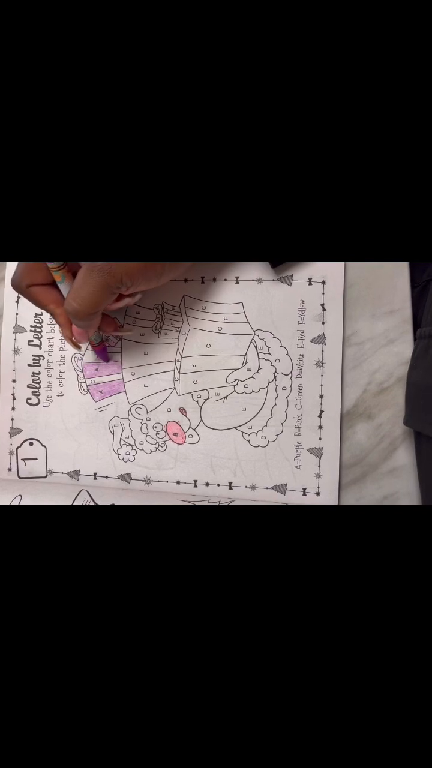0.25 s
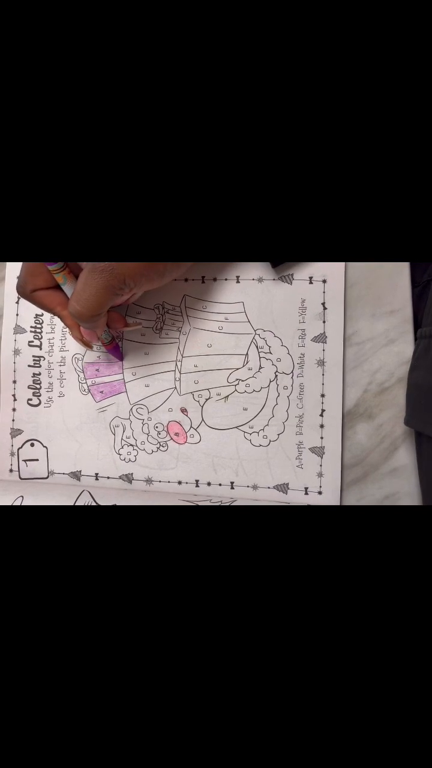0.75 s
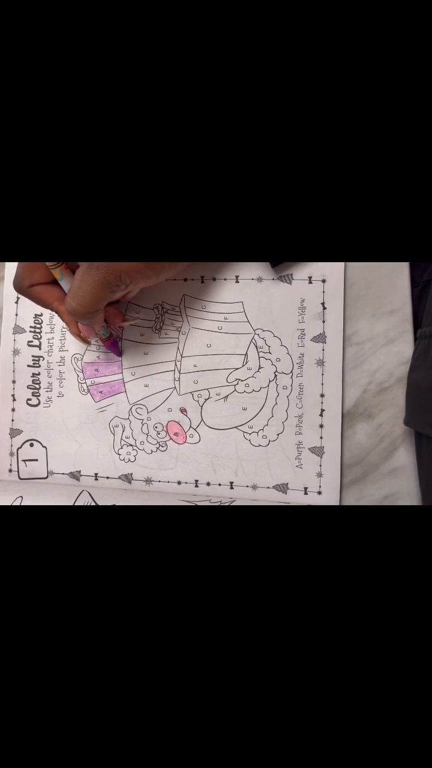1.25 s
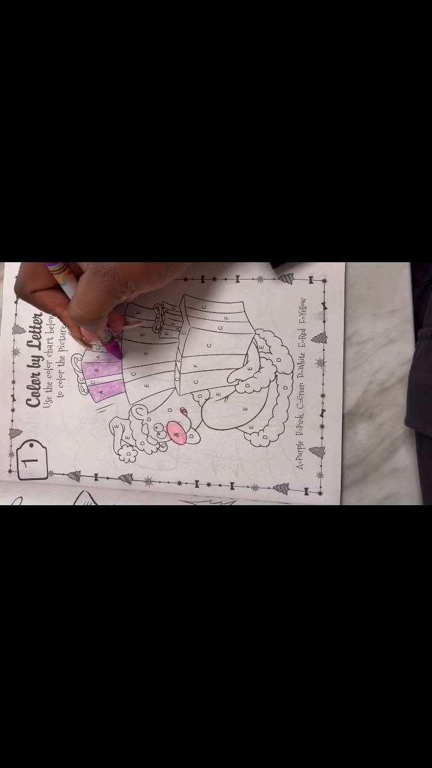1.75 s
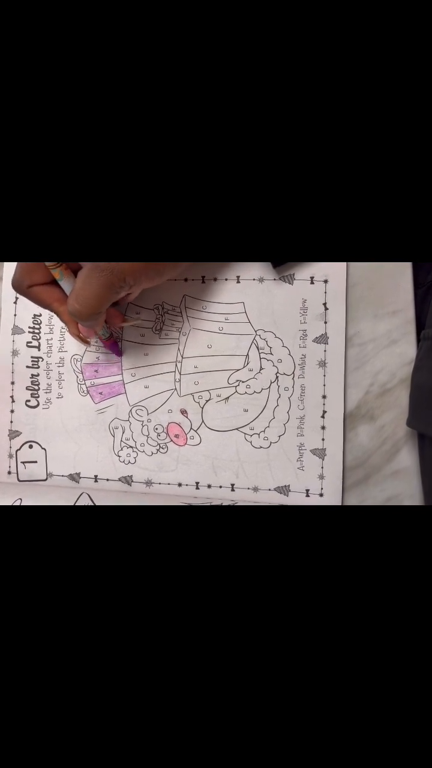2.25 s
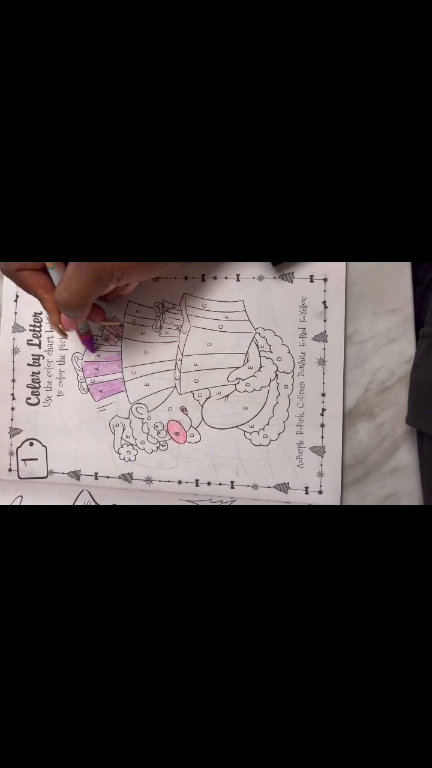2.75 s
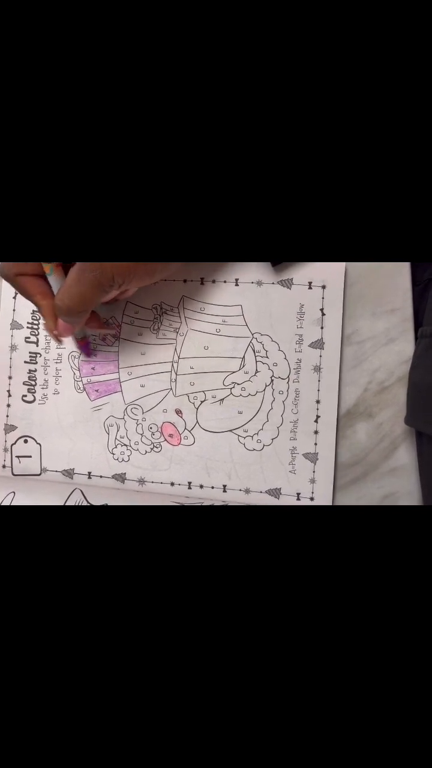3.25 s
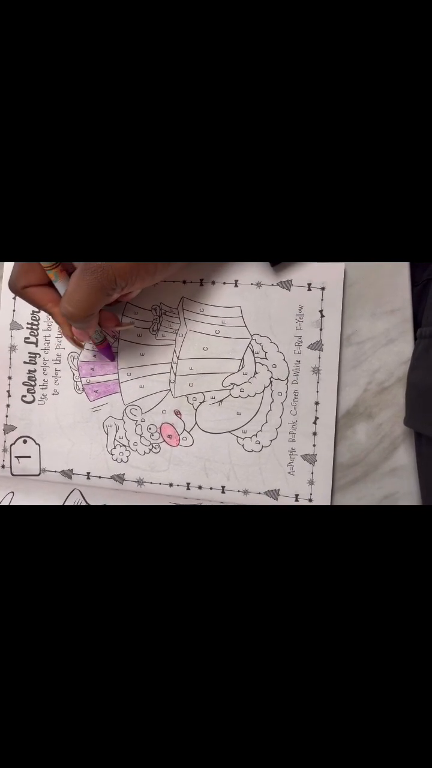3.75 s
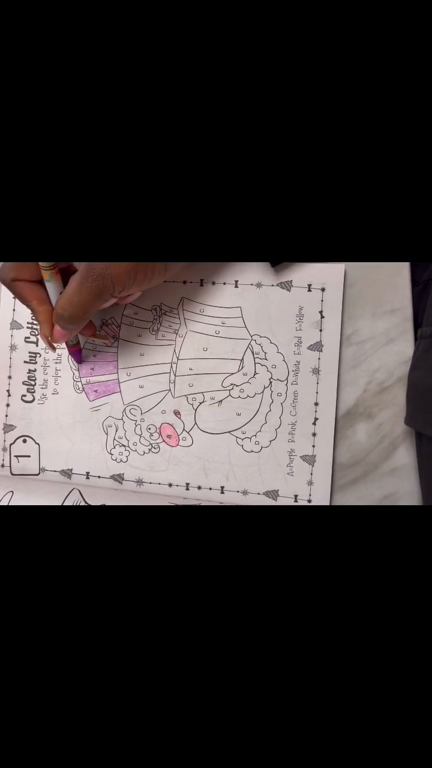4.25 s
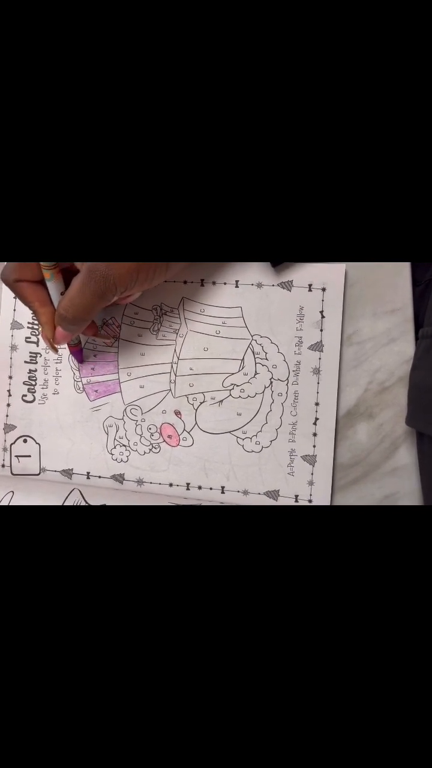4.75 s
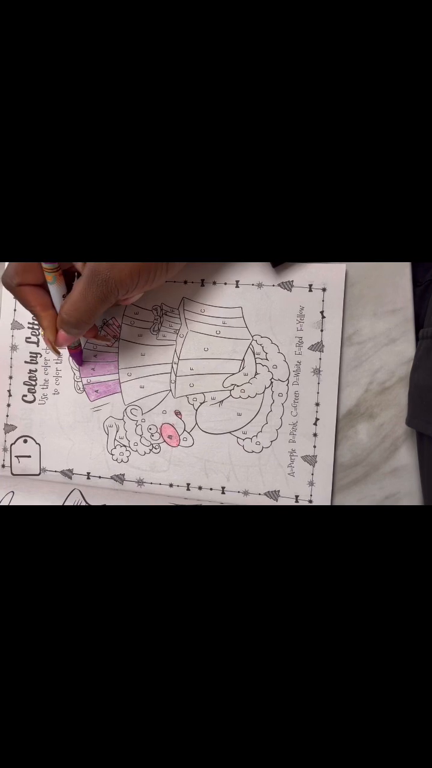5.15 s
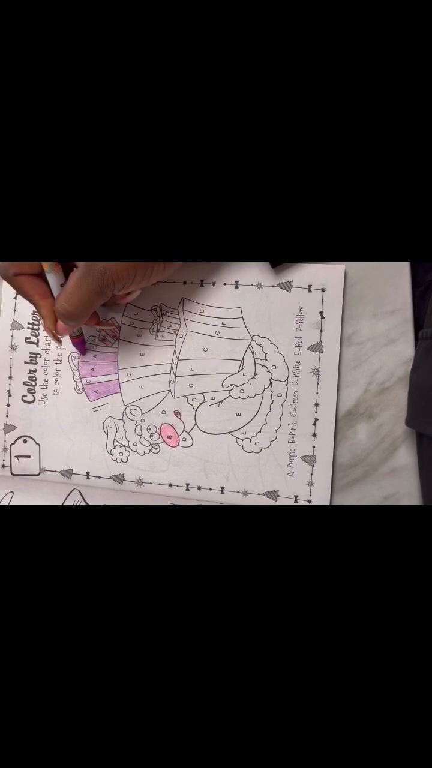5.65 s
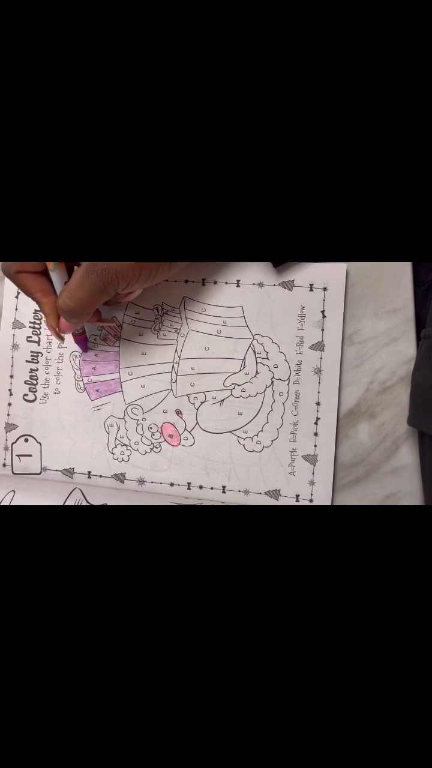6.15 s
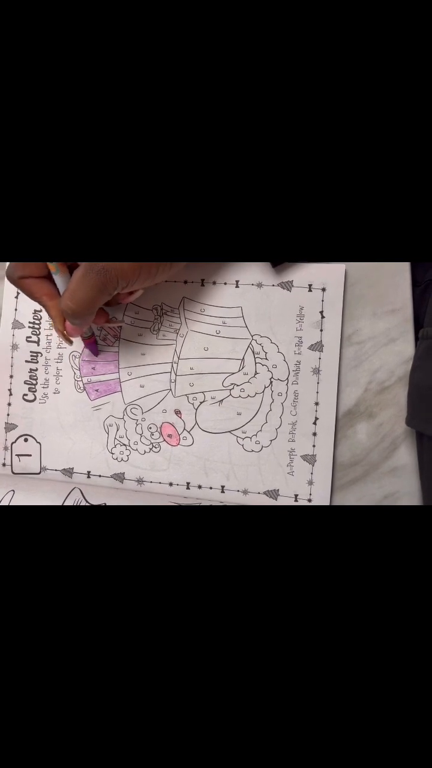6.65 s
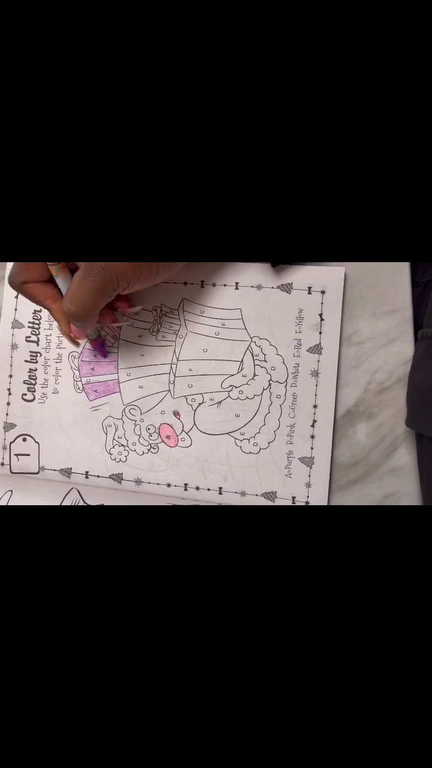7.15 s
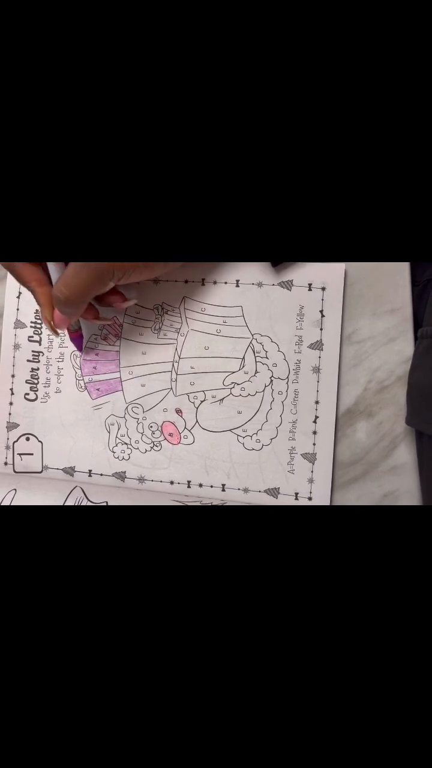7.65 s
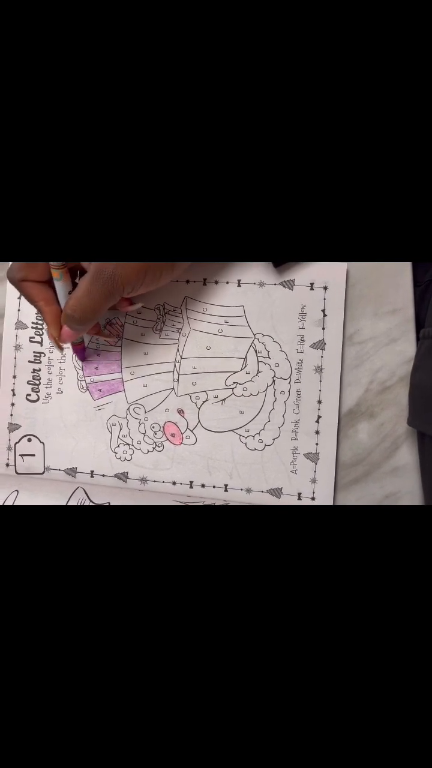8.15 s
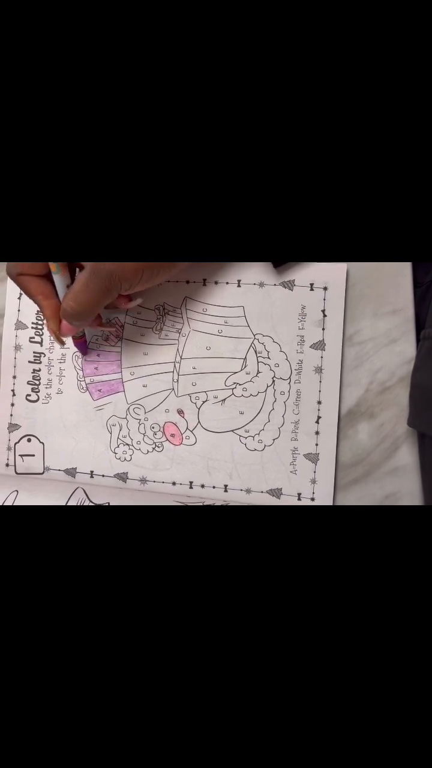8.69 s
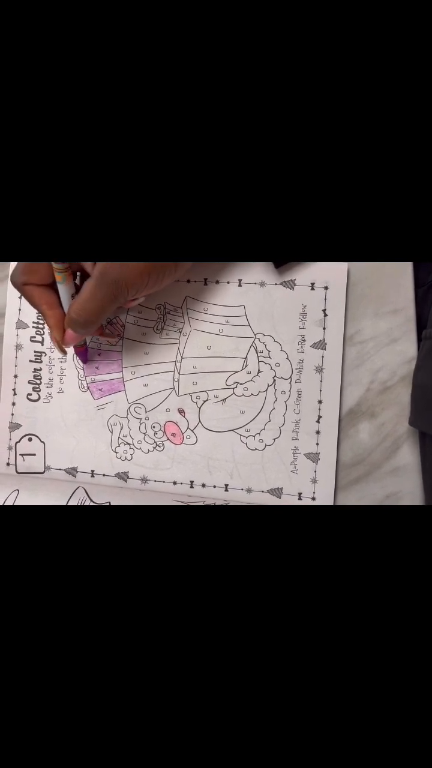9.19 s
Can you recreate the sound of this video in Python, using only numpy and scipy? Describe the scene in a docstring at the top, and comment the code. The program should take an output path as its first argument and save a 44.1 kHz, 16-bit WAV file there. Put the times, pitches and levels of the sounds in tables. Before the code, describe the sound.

Close, dry crayon scratching on a colouring page comes in uneven short bursts, the sheet rustling and ticking above a throbbing low motor hum indoors.

```python
"""A wax crayon is rubbed back and forth on a colouring page lying on a table, close to a two-port microphone.
Wax catching on paper fibres is grainy noise (hiss); it shakes the page (rustle) and the table (rumble).
The page ticks with short noise bursts, and dull knocks ring a few modes of the table.
Behind it, steady sines of motors and mains hum and beat, and shaped noise is the air's rumble and faint hiss.
Soft noise swells are scuffs further off, and short gliding sines are a bird's pips outside."""
import sys
import numpy as np
from scipy import signal
from scipy.fft import rfft, irfft, next_fast_len
from scipy.io import wavfile
from scipy.ndimage import uniform_filter1d

SR = 44100
rng = np.random.default_rng(int(sys.argv[2]) if len(sys.argv) > 2 else 0)


def unload_wav(signal):
    """Save mono or channel-first audio to the path in sys.argv[1] as 16-bit WAV at rate SR, clipped to [-1, 1]."""
    wavfile.write(
        sys.argv[1],
        SR,
        np.round(np.clip(np.atleast_2d(signal).T, -1, 1) * 32767).astype(np.int16),
    )


def undo_db(level):
    """Turn decibels back into plain size, where 20 dB means ten times bigger."""
    steps = np.asarray(level, float) / 20
    return 10 ** steps


N = 415403
T = np.arange(N) / SR  # time in s
SIZE = next_fast_len(N)  # transform length for filtering
HZ = np.arange(SIZE // 2 + 1) * SR / SIZE + 1e-6  # just above zero, so that its log exists

# colour of the table's rumble, under strokes and ticks: [f/Hz, relative level/dB]
TABLE_RUMBLE = [(250, -11), (450, 7), (700, 3.5), (1000, -4.5), (1500, -10.5), (2200, -38.5)]


def table(points):
    """A list of (Hz, value) points read at every frequency, straight on a log frequency axis."""
    hz, value = np.transpose(points)
    return np.interp(np.log(HZ), np.log(hz), value)


def shape(x, gain):
    """Filter by a gain given at every frequency."""
    return irfft(rfft(x, SIZE) * gain, SIZE)[..., :N]


def unit_rms(x):
    """Scale a sound to an rms of one."""
    return x / np.sqrt(np.mean(x ** 2))


def colour(x, points):
    """Shape a sound by (Hz, dB) points and bring it to unit rms."""
    return unit_rms(shape(x, undo_db(table(points))))


def walk(rate):
    """Smooth random drift of unit spread: noise averaged twice over 1 / rate seconds."""
    k = int(SR / rate)
    smooth = uniform_filter1d(uniform_filter1d(rng.standard_normal(N), k), k)
    return smooth / smooth.std()


def grit(spread_db, patchy_db, patch_rate):
    """Dense catches of wax on fibres: some large ones among many small, in patches."""
    catch_db = spread_db * np.minimum(rng.exponential(size=N), 6.5)
    patch_db = patchy_db * walk(patch_rate)
    return undo_db(catch_db + patch_db) * rng.standard_normal(N)


def flex(x, wander_db, rate, low, count):
    """As the rubbed sheet bends, each third of an octave from low (Hz) up swells and fades on its own."""
    y = np.zeros(N)
    for centre in np.log2(low) + np.arange(count) / 3:
        distance = np.abs(np.log2(HZ) - centre)  # in octaves
        band = shape(x, np.clip(1 - 3 * distance, 0, 1))
        y += undo_db(wander_db * walk(rate)) * band
    return unit_rms(y)


def ports(x, pan_db, alike, spare):
    """A sound at the two ports, with a treble lag; a spare signal supplies the part that is not alike."""
    # how far the left port's phase is ahead of the right's: [f/Hz, phase/rad]
    left_lead = [(0, 0), (5200, -.2), (6700, -1.2), (7900, -2.8), (8900, -3.5), (10500, -5.8),
                 (11100, -6.1), (13200, -6.5), (14600, -8.5), (15300, -9.3)]
    alike = np.clip(alike, 0, 1)
    sign = np.array([[1], [-1]])  # left, right
    turn = np.exp(.5j * sign * np.interp(HZ, *np.transpose(left_lead)))
    shared = shape(x, np.sqrt((1 + alike) / 2) * turn)
    opposed = sign * shape(spare, np.sqrt((1 - alike) / 2))
    return (shared + opposed) * undo_db(sign * pan_db / 2)


def crayon():
    """Each stroke speeds up and slows down, driving hiss, page and table together."""
    # strokes: [middle t/s, length/s, hiss level at full speed/dB, page rustle over hiss/dB]
    strokes = [(0.023, .045, -84, 10.5), (.132, 0.069, -76.5, -5), (0.318, .11, -81.5, -2),
               (0.813, 0.1, -91, -6), (1.084, .052, -74, -12), (1.217, 0.05, -69.5, -9),
               (1.78, .057, -84.5, -1), (1.85, 0.075, -86, -3), (1.935, .063, -87, 8),
               (2.357, 0.11, -69.5, -5.5), (2.519, 0.059, -68, -6.5), (2.66, 0.067, -65.5, -9),
               (2.794, 0.078, -68, -4.5), (2.918, 0.074, -71, 0.5), (2.994, 0.042, -70.5, 7),
               (3.08, 0.057, -69.5, 6), (3.208, .06, -70, 1), (3.262, 0.041, -67, 4),
               (3.369, .095, -69.5, -2.5), (3.528, 0.043, -70.5, -11), (3.597, 0.024, -77.5, -5),
               (3.667, 0.077, -73, -1), (3.859, .12, -70.5, -5), (4.035, .055, -73.5, -6),
               (4.188, 0.051, -70.5, -8), (4.322, 0.031, -88.5, 4), (4.523, .07, -73, -11),
               (4.701, .066, -73.5, -7), (4.917, .06, -81.5, -4.5), (4.99, 0.039, -85, -5),
               (5.056, 0.063, -79.5, -10), (5.209, 0.072, -80, -15), (5.263, 0.028, -81.5, -6),
               (5.388, .065, -82, -9), (5.552, 0.069, -78.5, -3.5), (5.696, .11, -78.5, -12),
               (5.843, 0.075, -84.5, -2), (5.904, 0.028, -78.5, -17), (6.178, .055, -85, -13),
               (6.321, 0.057, -70.5, -3), (6.453, 0.059, -69.5, -5), (6.581, .068, -76.5, -1.5),
               (6.699, .046, -71, -6), (6.755, 0.022, -87, 7), (6.821, 0.057, -75.5, -5),
               (6.893, .06, -76.5, 2.5), (6.953, 0.068, -72, -1.5), (7.096, 0.075, -68.5, 2),
               (7.187, 0.09, -79.5, 0), (7.29, 0.044, -77.5, 0), (7.401, 0.069, -74, -8),
               (7.467, 0.06, -75.5, -2), (7.638, 0.049, -85.5, -7), (7.753, 0.025, -85.5, 1),
               (7.838, 0.023, -78, 9), (7.982, 0.092, -79.5, -10), (8.113, 0.076, -71, -5),
               (8.222, 0.025, -83.5, 1), (8.543, .06, -72.5, -13), (8.726, 0.092, -80, -7),
               (8.932, 0.08, -79.5, -10), (9.089, 0.057, -87.5, -2), (9.281, 0.064, -81.5, -2.5)]
    # slow state of the sheet:
    # [t/s, rustle level between strokes/dB, table rumble level at full speed for a -75 dB hiss/dB]
    sheet_state = [(0, -92, -80), (.3, -89.5, -80.5), (1.3, -89, -75), (1.8, -90, -66),
                   (2.35, -88.5, -67.5), (2.6, -86, -69), (2.9, -91, -71), (3.2, -73, -74),
                   (3.4, -78.5, -71), (4.0, -88.5, -79.5), (4.4, -91.5, -72), (5.0, -92.5, -72),
                   (5.7, -93, -71), (6.3, -88, -73.5), (6.9, -84, -76.5), (7.6, -78.5, -76.5),
                   (8.0, -88, -75.5), (8.6, -90.5, -67), (9.4, -88, -67)]
    # colour of wax on paper fibres: [f/Hz, relative level/dB]
    hiss_colour = [(3500, -30), (5000, -26), (5900, -12), (7500, -4), (8400, 3), (9300, -4.5),
                   (11000, -3.5), (11900, 0.5), (12800, -3), (13600, -11.5), (14500, -3.5), (15400, -2.5),
                   (16000, -26.5)]
    # colour of the shaken page: [f/Hz, relative level/dB]
    rustle_colour = [(710, -42.5), (1200, -7), (1460, -5.5), (2070, -3), (2240, -6), (2470, -1),
                     (2970, -2.5), (4160, -5), (5720, -14), (6500, -7.5), (8450, -46), (14300, -120)]
    edge_db, squareness = -5.5, 2.57  # level half a length from the middle; how flat a stroke's top is
    drag_db = -7.5  # hiss of the tip dragging between strokes, over the rustle there
    rumble_follows = 0.37  # dB of rumble per dB of hiss above -75
    resting_db = -13.5  # rumble between strokes, against the sheet's rumble level

    power = np.zeros((3, N))  # hiss, page, table
    s, rustle_db, rumble_db = np.transpose(sheet_state)
    for middle, length_s, hiss_db, page_db in strokes:
        on = slice(max(int((middle - .3) * SR), 0), int((middle + .3) * SR))
        speed_db = edge_db * (2 * np.abs(T[on] - middle) / length_s) ** squareness
        desk_db = np.interp(middle, s, rumble_db) + rumble_follows * (hiss_db + 75)
        full_db = np.array([[hiss_db], [hiss_db + page_db], [desk_db]])
        power[:, on] += undo_db(full_db + speed_db) ** 2
    rustle_between_db = np.interp(T, s, rustle_db)
    power[0] += undo_db(rustle_between_db + drag_db) ** 2
    power[1] += undo_db(rustle_between_db) ** 2
    power[2] += undo_db(np.interp(T, s, rumble_db) + resting_db) ** 2

    fine = grit(2.9, 2.0, 90)
    hiss = flex(colour(fine, hiss_colour), 1.4, 25, 3200, count=9)
    hiss_spare = colour(fine * rng.choice([-1, 1], N), hiss_colour)  # same catches, random signs
    hiss_alike = table([(6000, 0.99), (8400, .93), (11000, 1.0), (13000, 0.94), (14500, 0.39)])
    # the page shares the fine catches of the hiss
    page_grits = (fine + grit(3.8, 3.1, 65), grit(1.5, 4.3, 60))
    page = [flex(colour(x, rustle_colour), 2.9, 49, 685, count=12) for x in page_grits]
    desk = [flex(colour(grit(2.8, 2.0, 36), TABLE_RUMBLE), 1.7, 23, 250, count=11) for _ in range(2)]
    layers = [ports(hiss, 0, hiss_alike, hiss_spare),
              ports(page[0], 1.3, 0.36, page[1]),
              ports(desk[0], -0.72, 0.13, desk[1])]
    return np.sum(np.sqrt(power)[:, None] * layers, axis=0)


def tones(rows, phases):
    """Steady sines, each with its own rms level and left-right balance."""
    out = np.zeros((2, N))
    for (hz, db, pan_db), phase in zip(rows, phases):
        level = undo_db(db + np.array([[pan_db], [-pan_db]]) / 2)
        out += np.sqrt(2) * level * np.cos(2 * np.pi * hz * T + phase)
    return out


def hum():
    """Close tones beat: pump against fan swells slowly, pump against mains throbs about four times a second."""
    # steady tones of a pump, the mains, fans and a thin buzz: [f/Hz, level/dB, left minus right/dB]
    pump_tones = [(57.87, -53.7, -1.3), (115.74, -51.2, .5), (231.5, -50.4, 1.7), (347.24, -76, -8)]
    mains_tones = [(119.97, -56.2, -.3), (239.94, -63.7, -3.1), (359.92, -68.1, -5.3), (479.89, -92, -7)]
    fan_tones = [(58.59, -51.4, -1.6), (24.1, -74, 0), (34.47, -65, -.5), (73.3, -68, -2), (104.5, -67, 0),
                 (109.64, -62.3, .2), (137.2, -69, 0), (140.64, -64, -.7), (149.43, -60.7, .8),
                 (168, -68, -.8), (174.4, -69.5, -1.4), (209, -73, 1), (269.4, -73, 1.5), (274.4, -76, -2),
                 (295, -79, 0)]
    buzz_tones = [(948.1, -102, -5), (1303.7, -101, -2), (1362.9, -103, -4), (2844.4, -99.6, -2),
                  (2903.7, -105, -1), (3022.2, -105, 6), (3081.4, -107, 3), (3199.9, -107, 5),
                  (3318.5, -107, 7)]
    # a low tone that comes and goes: [t/s, level/dB]
    waver_level = [(0, -59.5), (.9, -66.5), (2.1, -46), (3, -50.5), (3.7, -62), (4.5, -51.5), (6, -46.5),
                   (7.4, -50.5), (8, -68), (8.6, -47.5), (9.42, -43.5)]
    waver_hz = 52.15
    swell_s, throb_s = .853, .1586  # first moments when pump and fan, pump and mains pull together

    groups = (pump_tones, mains_tones, fan_tones, buzz_tones)
    pump, mains, fans, buzz = phases = [rng.uniform(0, 2 * np.pi, len(rows)) for rows in groups]
    # set the beating partners in step at those moments
    fans[0] = pump[0] - 2 * np.pi * (fan_tones[0][0] - pump_tones[0][0]) * swell_s
    mains[0] = pump[1] - 2 * np.pi * (mains_tones[0][0] - pump_tones[1][0]) * throb_s
    waver_phase = 2 * np.pi * waver_hz * T + .5 * walk(7.2)
    waver = np.sqrt(2) * np.cos(waver_phase) * undo_db(np.interp(T, *np.transpose(waver_level)))
    return sum(tones(rows, phase) for rows, phase in zip(groups, phases)) + waver


def air():
    """Broad rumble and faint hiss of the room; the deep bass is nearly the same at both ports."""
    # colour of the room's air: [f/Hz, relative level/dB]
    air_colour = [(12, -29.5), (22, -7.5), (50, -1), (115, -5.5), (180, -6), (252, -10.5), (306, -18),
                  (371, -18), (427, -30), (787, -44), (1340, -49), (3300, -57.5), (7500, -60.5),
                  (12700, -66), (13600, -63), (15500, -74), (16000, -83)]
    # how alike the two ports hear it: [f/Hz, likeness from 0 to 1]
    likeness = [(60, 0.97), (250, 0.83), (500, 0.086), (1400, 0.057), (3000, 0.085), (7000, 0.17),
                (12000, 1), (15000, 0.51)]
    mid, side = (colour(rng.standard_normal(N), air_colour) for _ in range(2))
    level_db = -50.5 + 1.1 * walk(0.37)
    return undo_db(level_db) * ports(mid, -1.2, table(likeness), side)


def ticks():
    """A quick crackle of the sheet with a grainy tail, and a little thud under it."""
    # page crackles: [t/s, level/dB, time to fall 60 dB/s]
    crackles = [(0.107, -64.5, .065), (0.468, -65.5, 0.035), (2.8689, -74, 0.032), (2.998, -51.5, 0.047),
                (3.052, -58, .044), (3.2582, -52.5, 0.096), (3.5872, -65, 0.059), (4.2424, -57.5, .018),
                (4.302, -70.5, 0.091), (4.4144, -73, 0.029), (6.6755, -68.5, .04), (6.829, -63.5, 0.098),
                (6.8833, -60, 0.068), (6.9481, -62.5, 0.13), (7.01, -65.5, 0.073), (7.0655, -58, .045),
                (7.0786, -54, 0.032), (7.1676, -69, 0.13), (7.251, -63, 0.11), (7.4807, -57, 0.042),
                (7.6257, -58, 0.044), (7.6563, -59, 0.031), (7.7198, -71, 0.12), (7.8153, -60.5, .05),
                (7.8805, -68.5, 0.029), (8.0316, -71, 0.15), (8.42, -60.5, 0.033), (9.009, -69, 0.037)]
    # colour of a crackle: [f/Hz, relative level/dB]
    crackle_colour = [(900, -27), (1500, -9.5), (2200, 1), (3200, -3), (4200, 3.5), (6000, -11), (9000, 2),
                      (13000, -34), (15500, -22)]
    rise_s, thud_db, thud_t60_s = 0.0013, -16, 0.1  # thud level is against the crackle
    crack, thud = np.zeros(N), np.zeros(N)
    for s, level_db, ring_s in crackles:
        on = slice(int(s * SR), int((s + 0.11) * SR))  # longer tails stop here
        age = T[on] - T[on][0]
        rise = 1 - np.exp(-age / rise_s)
        tail = rise * undo_db(-60 * age / ring_s)
        snap = .4 * undo_db(-60 * age / .006)
        crack[on] += undo_db(level_db) * (tail + snap)
        thud[on] += rise * undo_db(level_db + thud_db - 60 * age / thud_t60_s)
    colours = (crackle_colour, crackle_colour, TABLE_RUMBLE, TABLE_RUMBLE)
    noise = [colour(grit(2.9, 0.5, 200), points) for points in colours]
    sheet = ports(noise[0], 3, .85, noise[1])
    desk = ports(noise[2], 0, 0.46, noise[3])
    return crack * sheet + thud * desk


def scuffs():
    """Soft, roomy rubs: a quick rise and a long dull fade of banded noise, different at each port."""
    # distant scuffs: [t/s, rise/s, time to fade 39 dB/s, level/dB, centre f/Hz, octaves to 9 dB down]
    rubs = [(.2, 0.022, 0.37, -72.5, 2150, 0.55), (1.515, 0.0086, 0.21, -68, 890, 1.26),
            (1.52, .02, .25, -70.5, 596, 0.38), (1.725, .03, 0.37, -73.5, 597, 0.53),
            (2.13, 0.0055, 0.23, -71, 2200, 0.78), (2.135, 0.013, 0.36, -64, 704, 0.75),
            (2.25, 0.033, 0.17, -66.5, 890, .6), (4.5, .02, 0.11, -64.5, 790, .6),
            (4.655, .01, .08, -74, 3200, .4), (5.22, 0.032, 0.24, -79.5, 2280, .4),
            (8.3, 0.067, 0.68, -77.5, 2000, 0.73), (7.83, 0.028, .2, -68.5, 690, .5),
            (8.06, .03, 0.21, -73, 690, 0.38), (8.64, .02, 0.093, -73, 1470, .3),
            (9.37, 0.0072, 0.046, -74, 2360, 0.35)]
    mid, side = grit(1.2, 1.8, 40), grit(1.2, 1.7, 40)
    both = np.array([mid + 1.2 * side, mid - 0.6 * side])
    out = np.zeros((2, N))
    for s, rise_s, fade_s, db, hz, octaves in rubs:
        age = np.maximum(T - s, 0)
        swell = (1 - np.exp(-age / rise_s)) * undo_db(db - 39 * (age / fade_s) ** 2)
        band = [(hz * 2 ** (k * octaves), -9 * k * k) for k in range(-3, 4)]
        out += swell * colour(both, band)
    return out


def bird():
    """Thin, nearly pure gliding pips with a slight flutter in level, a little louder on the right."""
    # bird pips: [t/s, length/s, start f/Hz, end f/Hz, level/dB]
    pips = [(.868, .065, 3350, 3360, -89), (2.65, .125, 3630, 3680, -82), (6.375, .13, 3700, 3520, -81),
            (6.5, .115, 4060, 3820, -87), (7.815, .062, 3370, 3350, -78)]
    out, flutter_db = np.zeros(N), 1.6 * walk(60)
    for s, length_s, start_hz, end_hz, db in pips:
        share = np.clip((T - s) / length_s, 0, 1)  # how much of the pip has passed
        pitch_hz = start_hz + (end_hz - start_hz) * share ** 2
        phase = 2 * np.pi * np.cumsum(pitch_hz) / SR
        swell = np.sin(np.pi * share ** 0.53) ** 0.32
        out += undo_db(db + flutter_db) * swell * np.sin(phase)
    return np.sqrt(2) * out * undo_db(np.array([[-1.], [1.]]))


def knocks():
    """Dull knocks of crayon or knuckle: each rings the table's short modes with its own mix."""
    # knocks: [t/s, level/dB, brightness/dB per octave around 700 Hz]
    hits = [(1.522, -73, -8), (1.732, -65.5, -7.5), (4.651, -72, -5), (5.212, -65.5, -15),
            (5.334, -67.5, -17), (5.53, -74, -2), (5.59, -65.5, 0.5), (5.614, -61.5, -6), (5.845, -62, -13),
            (7.475, -62.5, -14), (8.937, -66, -0.5), (9.051, -58.5, -8)]
    # modes of the table, before each knock's random detuning: [f/Hz, relative level/dB, time to fall 60 dB/s]
    modes = [(560, 1, 0.032), (728, 6.5, 0.055), (910, -2.5, 0.064), (1360, 1, 0.034), (1630, -2.5, 0.057),
             (1960, -1, 0.064), (2600, -12.5, .01)]
    out, age = np.zeros((2, N + SR)), T[:SR // 10]
    hz, db, t60_s = np.transpose(modes)[:, :, None]
    chance = rng.standard_normal((len(hits), 3, len(hz), 1))
    for (s, level_db, tilt_db), (mix, detune, spread) in zip(hits, chance):
        mode_db = level_db + db + tilt_db * np.log2(hz / 700) + 2 * mix
        ring = undo_db(mode_db - 60 * age / t60_s)
        phase = 2 * np.pi * hz * (1 + 0.052 * detune) * age
        start = int(s * SR)
        for side, sign in zip(out, (1, -1)):  # the ports hear each mode at different phases
            side[start:start + len(age)] += np.sum(ring * np.sin(phase + 0.85 * sign * spread), axis=0)
    return out[:, :N]


def scene():
    """Everything at the two ports."""
    return crayon() + hum() + air() + ticks() + scuffs() + bird() + knocks()


def band_limit(x):
    """A steep low-pass at the top of the band."""
    return signal.sosfilt(signal.butter(12, 15610, fs=SR, output="sos"), x)


def record(dry):
    """The finished mix of the two ports, as it is stored."""
    return band_limit(dry)


dry = scene()
out = record(dry)
unload_wav(out)
```